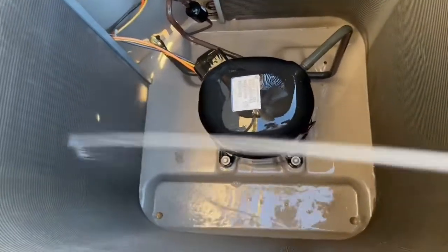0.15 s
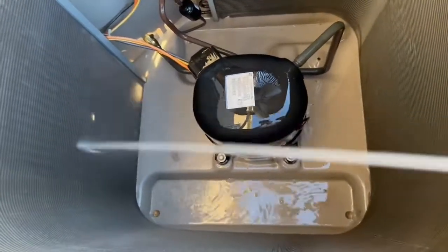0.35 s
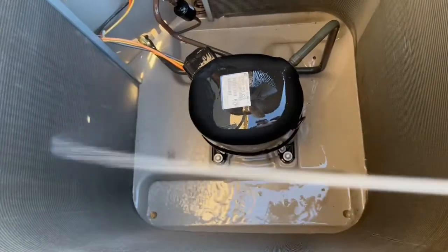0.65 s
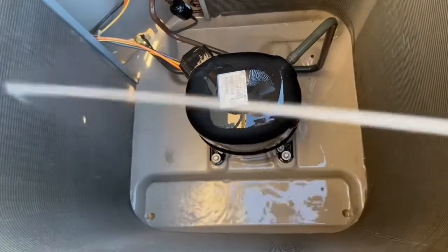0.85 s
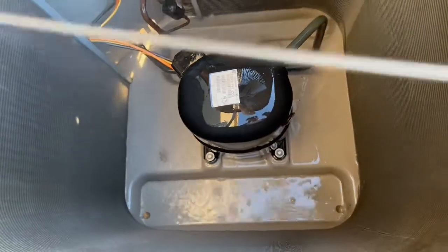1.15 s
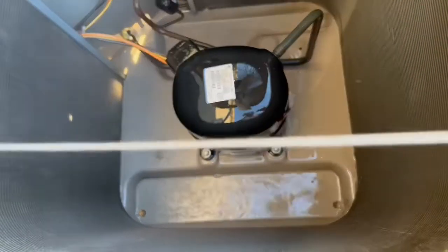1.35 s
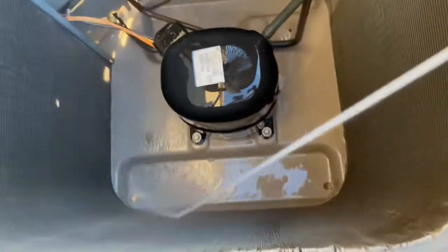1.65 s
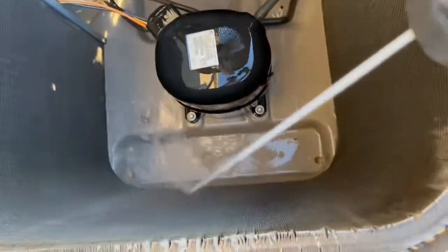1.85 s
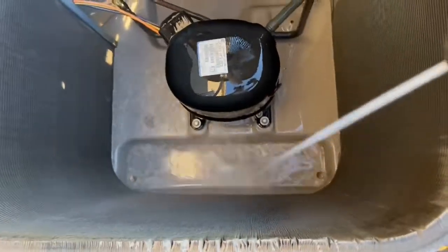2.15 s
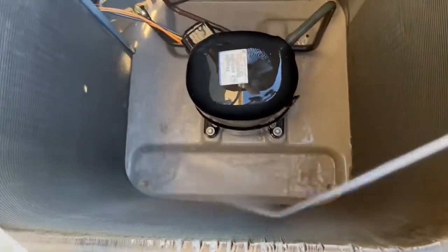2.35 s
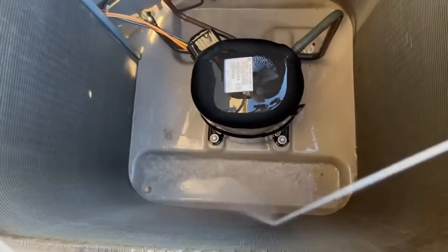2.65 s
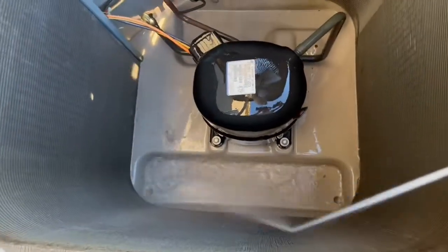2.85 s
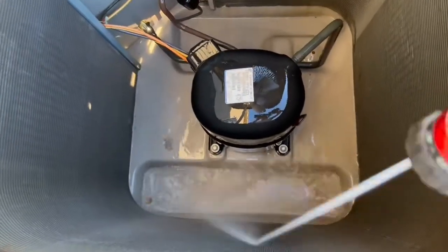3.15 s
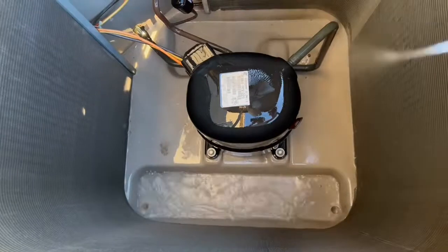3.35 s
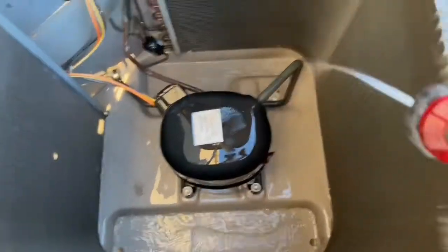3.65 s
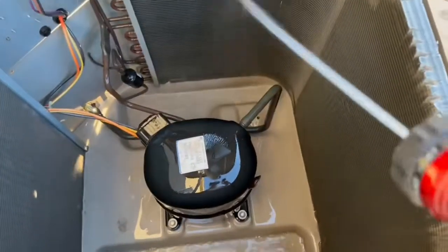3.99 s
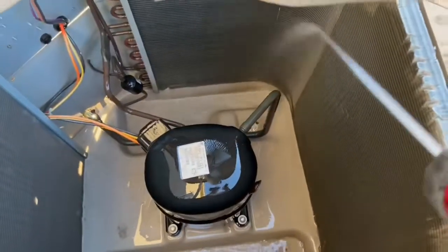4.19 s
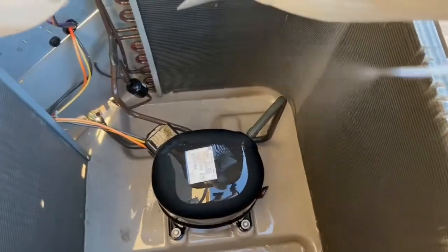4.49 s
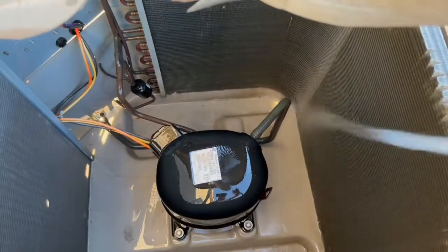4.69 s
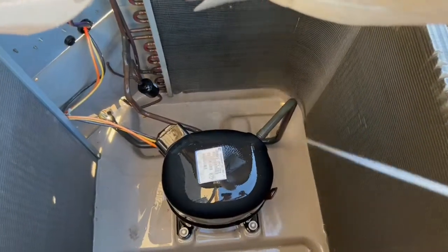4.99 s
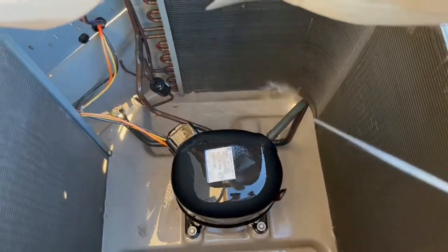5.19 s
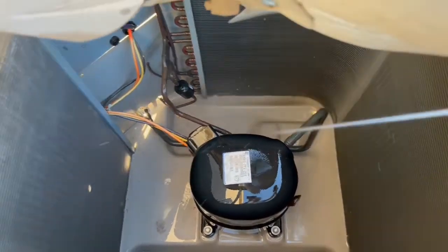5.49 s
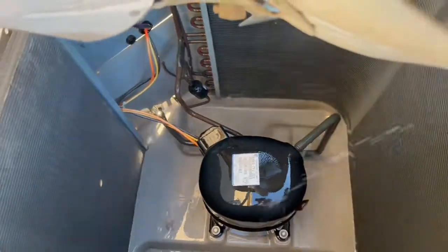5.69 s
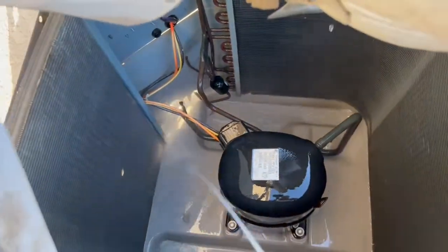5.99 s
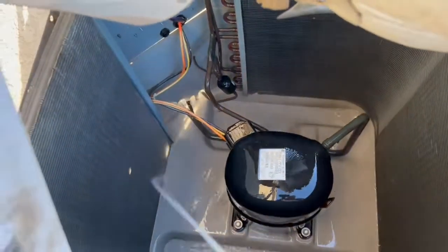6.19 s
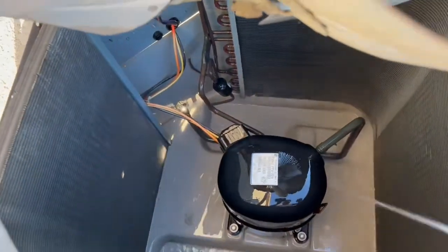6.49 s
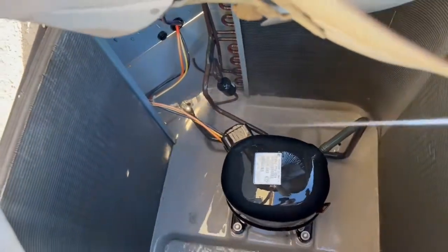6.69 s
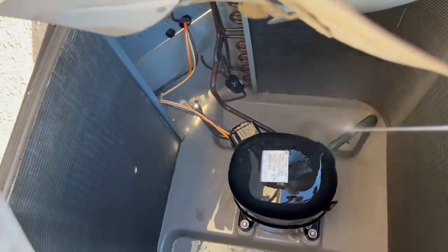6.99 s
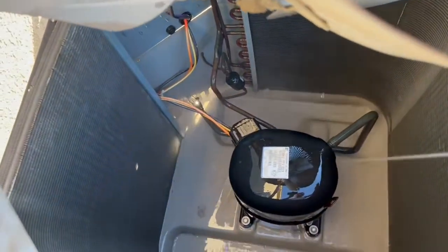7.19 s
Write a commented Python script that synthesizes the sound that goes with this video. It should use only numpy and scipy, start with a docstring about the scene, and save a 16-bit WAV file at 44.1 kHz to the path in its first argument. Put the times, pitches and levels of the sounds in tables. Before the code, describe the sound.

Close, wide stereo sound of a hose jet inside a metal outdoor cooling unit. From 0 to 1.3 seconds a strong, bright, grainy hiss of fine drops plays on thin coil fins, with a duller body and narrow ring. It falls away by 1.6 and stays softer, with light splatters on the pan around 1.7 to 2.3 and 3.1 and short dips near 2.4, 3.1 and 3.25. A brief metallic splash comes at 3.7. Hiss swells at 4.5 to 4.7, dipping between. From 4.9 the solid jet drums on pipes and casing in fast uneven bursts, hollow to tinny, with sudden near-gaps at 5.13 and 5.78. The hardest, wettest hits run from 5.8 to 7.3, ending abruptly mid-spray. A soft low bump sounds at 6.3 and dies quickly. A faint steady noise floor, dull outdoor rumble and low wavering machine hum continue underneath.

```python
"""Inside an outdoor air-conditioning unit, a garden hose jet sweeps over coil, pipes, casing and base pan.
On the thin coil fins random drop impacts make a bright hiss, a duller coil body and a narrow gliding ring.
Where the solid jet crosses metal, slugs of water drive four registers of resonances in short bursts.
A faint constant floor of dense random impulses lies under the jet, the casing is bumped once as a decaying
low sine, and a low outdoor rumble of coloured noise with a wavering machine hum lies underneath."""
import sys
import numpy as np
from scipy import signal
from scipy.io import wavfile

SR = 44100
rng = np.random.default_rng(int(sys.argv[2]) if len(sys.argv) > 2 else 0)


def dump_mix(stems):
    """Bounce the given channels to the path in sys.argv[1] as a 16-bit WAV at rate SR."""
    frames = np.atleast_2d(stems).T  # one column per channel
    limited = np.clip(frames, -1, 1)  # hard clip at full scale
    pcm = np.round(limited * 32767).astype(np.int16)
    wavfile.write(sys.argv[1], SR, pcm)


def elevation(decibels):
    """Turn decibel levels (scalar or array-like) into linear amplitude ratios."""
    levels = np.asarray(decibels, float)
    return 10 ** (levels / 20)


N = 323694  # length in samples

# Casing and pan resonances, deep to bright. Each row: pitch in Hz, width in Hz, relative level in dB.
DEEP_MODES = [(381, 16, -4.5), (394, 9.3, -13.5), (495, 13.4, 6), (512.7, 19.4, 8), (607, 19, 0)]
# The same columns: pitch in Hz, width in Hz, relative level in dB.
MIDDLE_MODES = [(728, 9.8, 4.9), (777, 18, 1.5), (861.7, 39, 8), (954, 19, 6.5)]
# The same columns: pitch in Hz, width in Hz, relative level in dB.
UPPER_MODES = [(1156, 20, -11), (1300, 53, 4.5), (1470, 50, 2.5), (1680, 46, 0)]
# The same columns: pitch in Hz, width in Hz, relative level in dB.
BRIGHT_MODES = [(1870, 300, 8), (2120, 29, 3.5), (2292, 34, 5.5), (2342, 30, 8), (2490, 17, -11),
                (2790, 89, -3), (3124, 36, 7), (3520, 48, 2.5), (3550, 280, 8), (4100, 27, 7),
                (4210, 70, 3), (4525, 98, 4), (4970, 280, -4), (4770, 87, -1.5), (5330, 150, 5),
                (6060, 130, -2)]


def unit_power(x):
    """Scale to unit power."""
    return x / np.sqrt(np.mean(x ** 2) + 1e-20)


def in_time(rows):
    """Columns of a table whose first column is seconds, read at every sample."""
    seconds, *columns = np.transpose(rows)
    return [np.interp(np.arange(N) / SR, seconds, column) for column in columns]


def at_hz(points, hz):
    """A curve over pitch, read on a log-frequency axis."""
    point_hz, values = np.array(points).T
    return np.interp(np.log(hz), np.log(point_hz), values)


def drift(rate_hz):
    """Slow random wander with spread 1: noise through a double low-pass, computed at every 40th sample."""
    r = np.exp(-2 * np.pi * rate_hz * 40 / SR)
    noise = rng.standard_normal(N // 40 + 2002)
    slow = signal.lfilter([1], [1, -2 * r, r * r], noise)[2000:]  # the filter has settled by then
    return np.interp(np.arange(N) / 40, np.arange(len(slow)), unit_power(slow))


def impacts(per_s, spread_db):
    """Two pairs of unrelated streams of random impulses, a few of them much larger than the rest."""
    shape = (2, 2, N)
    sizes = elevation(spread_db * np.minimum(rng.exponential(1, shape), 5))
    sizes = sizes * rng.choice([-1, 1], shape)
    landing = rng.random(shape) < per_s / SR
    return unit_power(sizes * landing + 1e-9)


def surges(per_s, decay_s, spread_db):
    """The jet breaks into slugs: each lands at once and drains away; a gain near 1."""
    landed = (rng.random(N) < per_s / SR) * rng.exponential(1, N)
    swell = signal.lfilter([1], [1, -np.exp(-1 / (decay_s * SR))], landed)
    return elevation(spread_db * np.minimum(unit_power(swell - swell.mean()), 2))


def lull_db():
    """The jet slips off what it was hitting: a straight slide down in dB and a straight return."""
    # Each row: quietest moment, fading time and returning time in seconds, depth in the hiss in dB.
    lulls = [(0.685, .03, 0.015, 3.5), (0.806, 0.061, 0.029, 3), (1.155, 0.018, 0.014, 4),
             (2.12, 0.035, 0.015, 2), (2.24, .03, 0.0082, 2), (2.39, 0.039, 0.044, 5),
             (2.945, 0.036, 0.13, 2.5), (3.095, 0.036, 0.021, 8.5), (3.255, .07, 0.08, 8.5),
             (3.535, 0.037, 0.043, 5.5), (3.68, 0.037, 0.011, 3), (4.61, 0.11, 0.047, 8),
             (4.81, 0.037, 0.014, 2.5), (5.054, 0.041, 0.06, 10), (5.133, 0.019, .004, 29),
             (5.29, 0.058, 0.069, 5), (5.362, 0.012, 0.015, 11), (5.782, 0.036, 0.0026, 24),
             (6.312, 0.013, .003, 4), (6.395, 0.064, 0.064, 7.5), (6.603, 0.021, 0.0052, 4.5),
             (6.828, 0.013, 0.0066, 9), (6.859, 0.022, 0.0064, 10), (7.015, 0.036, 0.0032, 11.5),
             (7.14, 0.032, 0.029, 6.5), (7.33, 0.029, .1, 10)]
    t = np.arange(N) / SR
    loss_db = 0
    for s, fade, back, depth_db in lulls:
        loss_db = loss_db + np.interp(t, [s - fade, s, s + back], [0, depth_db, 0])
    return -loss_db


def stereo(pair, hz):
    """Two streams become left and right with the likeness and lean of that pitch."""
    # How alike the two sides are. Each row: pitch in Hz, left-right correlation from 0 to 1.
    likeness = [(60, 1), (150, 1), (600, 1), (780, 1), (900, 0.58), (1080, .15), (1350, 0.53), (1800, .25),
                (2380, 0.42), (5980, 0.32), (15000, 0.17)]
    # How far the sound leans left. Each row: pitch in Hz, left over right in dB.
    left_lean = [(200, -.5), (380, -1.5), (950, -1), (2380, 3.5), (5980, 0), (15000, 6.5)]
    alike = np.clip(at_hz(likeness, hz), 0, 1)
    lean = at_hz(left_lean, hz) / 2
    middle = np.sqrt(1 + alike) * pair[0]
    side = np.sqrt(1 - alike) * pair[1] * [[1], [-1]]
    return elevation([[lean], [-lean]]) * (middle + side)


def coloured(streams, spectrum, patchy_db, rate_hz):
    """Third-octave bands, each with its own level and flicker; unit power."""
    out = 0
    edges = 25 * 2 ** np.arange(0, 9.7, 1 / 3)
    edges = edges[(edges >= spectrum[0][0]) & (edges <= 1.2 * spectrum[-1][0])]
    for k, (low, high) in enumerate(zip(edges, edges[1:])):
        band_pass = signal.butter(2, [low, high], "band", fs=SR, output="sos")
        band = signal.sosfilt(band_pass, streams[k % 2])  # neighbouring bands take unrelated pairs
        hz = np.sqrt(low * high)
        gain = elevation(at_hz(spectrum, hz) + patchy_db * drift(rate_hz))
        out = out + gain * stereo(band, hz)
    return unit_power(out)


def resonant(streams, modes, wander_db, rate_hz):
    """Each mode is driven more or less by a slow random wander, and rings on."""
    out = 0
    for k, (hz, width_hz, level_db) in enumerate(modes):
        r = np.exp(-np.pi * width_hz / SR)
        push = streams[k % 2] * elevation(level_db + wander_db * drift(rate_hz)) / np.sqrt(width_hz)
        poles = [1, -2 * r * np.cos(2 * np.pi * hz / SR), r * r]
        out = out + stereo(signal.lfilter([1 - r, 0, r - 1], poles, push), hz)
    # the set of modes together has about unit gain for steady noise
    return out / np.sqrt(2 * np.pi / SR * np.sum(elevation(2 * np.array(modes)[:, 2])))


def gliding(x, hz, width_hz):
    """One resonance whose centre moves, stepped in short blocks."""
    r = np.exp(-np.pi * width_hz / SR)
    out, state = np.zeros_like(x), np.zeros((2, 2))
    for i in range(0, N, 256):
        poles = [1, -2 * r * np.cos(2 * np.pi * hz[i] / SR), r * r]
        out[:, i:i + 256], state = signal.lfilter([1, 0, -1], poles, x[:, i:i + 256], zi=state)
    return out


def outdoors():
    """Dull distant rumble that swells slowly, with a wavering machine hum."""
    # Colour of the rumble. Each row: pitch in Hz, relative level per hertz in dB.
    rumble_spectrum = [(18, -71), (30, -84), (91, -1), (141, 3), (166, 2), (197, -5.5), (270, -7),
                       (335, -12.5), (459, -6.5), (939, -5.5), (1150, -9), (1230, -15.5), (1600, -1),
                       (2080, -15), (3520, -120)]
    # Swell of the rumble. Each row: time in seconds, level in dB.
    rumble_swell = [(0.0, -48), (0.95, -52), (1.3, -50), (2.2, -50.5), (3.0, -49), (5.8, -46.5),
                    (6.29, -45), (6.42, -49.5), (7.0, -45), (7.34, -54)]
    # Tones of the machine hum. Each row: pitch in Hz, width in Hz, relative level in dB.
    hum_modes = [(119.3, 3.7, 1), (249.5, 6, -1)]
    air = rng.standard_normal((2, 2, N))
    rumble_db, = in_time(rumble_swell)
    rumble = elevation(rumble_db) * coloured(air, rumble_spectrum, patchy_db=1.3, rate_hz=0.49)
    hum = elevation(-61) * resonant(air, hum_modes, wander_db=0.5, rate_hz=1.5)
    return rumble + hum


def steady_floor():
    """A faint, constant band of dense random impulses around 2 to 6 kHz, a steady noise floor under the jet."""
    band = signal.butter(1, [1820, 6100], "band", fs=SR, output="sos")
    floor = signal.sosfilt(band, impacts(3000, spread_db=4.0)[0])
    return elevation(-51.5) * unit_power(stereo(floor, hz=3000))


def bump():
    """One soft low knock on the casing: a sine that rises, rings briefly and dies."""
    start_s, rise_s, t60_s = 6.325, 0.012, 0.29
    hz, level_db = 266, -35.5  # level before rise and decay
    t = np.maximum(np.arange(N) / SR - start_s, 0)
    decay = elevation(level_db - 60 * t / t60_s)
    rise = 1 - np.exp(-t / rise_s)
    return decay * rise * np.sin(2 * np.pi * hz * t)


def drumming():
    """Gain of the four drumming registers: each stay on the metal swells, holds and drains."""
    # The solid jet rests on a pipe, the casing or the pan. Each row: start in seconds, stay in seconds,
    # then the drive of the deep, middle, upper and bright registers in dB.
    stays = [(1.02, .18, -57, -50, -46, -48), (1.73, 0.0022, -65, -55, -60, -38),
             (2.053, 0.011, -58, -45, -44, -38), (2.15, 0.026, -58, -45, -42.5, -35),
             (2.248, 0.015, -60, -38, -40.5, -30.5), (3.119, 0.0078, -62, -44, -40, -33),
             (3.33, 0.087, -56, -64, -66, -60), (3.481, 0.022, -40, -54, -54, -45),
             (3.73, 0.0081, -46, -43, -33, -28), (4.53, 0.13, -50, -66, -68, -66),
             (4.70, 0.018, -47, -52, -51, -48), (4.915, 0.044, -48, -39, -34.5, -24),
             (4.959, 0.075, -33, -31, -29, -20.5), (5.073, 0.061, -26.5, -26.5, -22.5, -24),
             (5.14, 0.083, -46, -40.5, -36, -27.5), (5.225, 0.034, -40, -34, -33, -19),
             (5.325, .03, -45, -38.5, -31, -21.5), (5.384, 0.074, -52, -39, -28, -26),
             (5.46, 0.082, -37, -36.5, -36.5, -35), (5.559, 0.078, -60, -44.5, -35, -26),
             (5.67, 0.036, -44, -56, -63, -37), (5.789, 0.037, -28, -33.5, -23.5, -18),
             (5.86, 0.05, -47, -45, -39, -31.5), (5.942, 0.063, -24, -26, -34, -18.5),
             (6.029, 0.049, -36, -24, -31, -21.5), (6.114, 0.031, -52, -48, -30, -18.5),
             (6.14, 0.034, -23.5, -35, -36, -44), (6.2, 0.077, -40, -53, -58, -40),
             (6.316, 0.043, -28.5, -29.5, -37, -21.5), (6.405, 0.059, -45, -40, -32, -22.5),
             (6.45, 0.039, -28, -36, -25, -23), (6.499, 0.063, -28, -36.5, -31, -21.5),
             (6.609, 0.18, -45.5, -39.5, -32.5, -30), (6.829, 0.013, -35, -45, -28, -23.5),
             (6.87, 0.051, -28, -31, -23.5, -20.5), (6.95, 0.058, -42, -43, -47, -32.5),
             (7.022, .11, -31, -37.5, -34, -25), (7.17, 0.032, -38, -37, -41, -24.5),
             (7.221, 0.026, -34, -33.5, -35, -19), (7.27, 0.041, -38, -32, -34, -27)]
    arrive_db_per_s, leave_db_per_s = 900, 506
    lull_share = 0.81  # depth of a lull here, as a share of its depth in the hiss
    t, power = np.arange(N) / SR, np.zeros((4, N))
    for s, stay, *levels_db in stays:
        near = slice(int((s - 0.1) * SR), int((s + stay + 0.2) * SR))
        before_db = arrive_db_per_s * (s - t[near])
        after_db = leave_db_per_s * (t[near] - s - stay)
        loss_db = np.maximum(0, np.maximum(before_db, after_db))
        power[:, near] += elevation(2 * (np.array(levels_db)[:, None] - loss_db))
    return np.sqrt(power) * elevation(lull_share * lull_db())


def metal():
    """The solid jet hammers pan, casing and pipes; each register answers with a broad thud and ringing modes."""
    # Colour of the thuds. Each row: pitch in Hz, relative level per hertz in dB.
    thud_spectrum = [(160, -48), (280, -79), (493, 2), (644, 5), (855, 1), (1300, 1.5), (2300, -2.5),
                     (2910, -3), (3580, -3), (7370, -13.5), (12000, -50), (15600, -53), (22000, -120)]
    # Drumming registers. Each row: modes, low edge in Hz, high edge in Hz, broad thud and ring in dB
    # over the drive.
    registers = [(DEEP_MODES, 280, 544, -8.5, -6.5), (MIDDLE_MODES, 608, 1125, -3, -4.5),
                 (UPPER_MODES, 1050, 1594, -7, -3), (BRIGHT_MODES, 1580, 15700, -3, -5.5)]
    slugs = impacts(4000, spread_db=3.5) * surges(40, 0.036, spread_db=1.95)
    body = coloured(slugs, thud_spectrum, patchy_db=2.5, rate_hz=10.3)
    out = 0
    for gain, (modes, low_hz, high_hz, thud_db, ring_db) in zip(drumming(), registers):
        band = signal.butter(3, [low_hz, high_hz], "band", fs=SR, output="sos")
        thud = gain * elevation(thud_db) * unit_power(signal.sosfilt(band, body))
        ringing = resonant(slugs * gain * elevation(ring_db), modes, wander_db=5, rate_hz=24)
        out = out + thud + ringing
    return out


def fins():
    """Fine drops burst on the fins: bright hiss, below it the duller body of the coil and its narrow ring."""
    # Colour of the hiss. Each row: pitch in Hz, relative level per hertz in dB.
    hiss_spectrum = [(2940, -33), (5000, -16), (7000, -10), (11100, -2), (15100, -10), (16000, -10)]
    # Colour of the coil body. Each row: pitch in Hz, relative level per hertz in dB.
    body_spectrum = [(180, -58), (300, -19), (502, -18.5), (628, -11), (688, -17), (969, -11.5),
                     (1140, -21.5), (1280, -41), (1830, -8), (2110, -10.5), (2570, 3), (4240, 2.5),
                     (7000, -9), (9100, -27), (15400, -120)]
    # Pitch of the fin ring as the jet moves. Each row: time in seconds, pitch in Hz.
    ring_glide = [(0.0, 2120), (0.45, 2145), (2.12, 2070), (2.3, 2170), (2.39, 2130), (3.42, 2250),
                  (3.87, 2140), (4.09, 2320), (4.25, 2120), (4.39, 2240), (4.88, 2140)]
    # The jet on the fins. Each row: time in seconds, hiss level in dB, coil body and fin ring in dB
    # over the hiss, lift of the top treble in dB, left over right in dB.
    jet = [(0.0, -22, -6.5, -13.5, 5, 1), (0.55, -24, -5.5, -9.5, 5.5, 1), (0.95, -22, -9.5, -13.5, 1, 1.5),
           (1.29, -23.5, -8.5, -20.5, 0.5, 1.5), (1.45, -30, -8.5, -2.5, 2, 0.5),
           (1.565, -35, -6.5, -2.5, 7, 1), (1.59, -40, -7, -6, 6, 4.5), (2.0, -36, -10, -18.5, 1.5, 0),
           (2.35, -33, -10.5, -14, 2.5, -1), (2.5, -29, -16.5, -17, -2, -0.5),
           (2.85, -30, -13, -13.5, -1.5, -1.5), (3.2, -30.5, -8.5, -12, 1.5, 0),
           (3.47, -28.5, -17, -18.5, -4.5, 0), (3.6, -32, -9.5, -7, -2, -1.5), (4.0, -31, -9, -8, 2.5, -1),
           (4.25, -29.5, -9.5, -10.5, 1, -1), (4.33, -29.5, -6.5, -6.5, 5, -.5),
           (4.5, -26, -12, -14.5, 2, -.5), (4.7, -24, -16.5, -18, -2.5, 0),
           (4.9, -29.5, -10.5, -8, 5.5, -1.5), (5.15, -28.5, -25, -1.5, 7.5, -2.5),
           (5.55, -26, -6.5, -29, -3, -2), (5.66, -28.5, -7, -25, -1, -2), (5.75, -29.5, -11, -27, 2, -2),
           (5.85, -35, 2.5, -31, 8, -1), (6.12, -28.5, -3.5, -6, 1, -.3), (6.3, -28, -9.5, -10.5, 3.5, 1),
           (6.55, -32.5, -1, -3, 3.5, -2), (6.79, -29, -15, -24, 2.5, -2), (7.05, -29, -7, -9, 4, -1.5),
           (7.34, -31, 4.5, -1, 6, -.5)]
    lull_share = 1.46  # depth of a lull in the coil, as a share of its depth in the hiss
    hiss_db, body_db, ring_db, top_db, pan_db = in_time(jet)
    ring_hz, = in_time(ring_glide)
    gush = surges(50, 0.0043, spread_db=1.0)
    spray = impacts(9000, spread_db=1.5)

    hiss = coloured(spray, hiss_spectrum, patchy_db=1.73, rate_hz=16.5)
    high_pass = signal.butter(2, 12000, "high", fs=SR, output="sos")
    hiss = hiss + (elevation(top_db) - 1) * signal.sosfiltfilt(high_pass, hiss)

    body = coloured(spray, body_spectrum, patchy_db=2.5, rate_hz=23)
    ring = gliding(spray[0] * elevation(3 * drift(20)), ring_hz, width_hz=300)
    ring = gliding(ring, ring_hz, width_hz=600)
    coil = elevation(body_db) * body + elevation(ring_db) * unit_power(stereo(ring, hz=2376))

    lull = lull_db()
    sides = elevation(pan_db / 2 * [[1], [-1]])
    return sides * elevation(hiss_db) * gush * (elevation(lull) * hiss + elevation(lull_share * lull) * coil)


def scene():
    """All sources together."""
    return outdoors() + steady_floor() + bump() + metal() + fins()


def top_cut(x):
    """Nothing passes above the cut-off."""
    return signal.sosfilt(signal.butter(12, 16950, fs=SR, output="sos"), x)


def record(dry):
    """The top is cut steeply above 16150 Hz."""
    steep_cut = signal.ellip(12, 0.5, 55, 16150, fs=SR, output="sos")
    mix = signal.sosfilt(steep_cut, dry)
    return top_cut(mix)


dry = scene()
out = record(dry)
dump_mix(out)
```